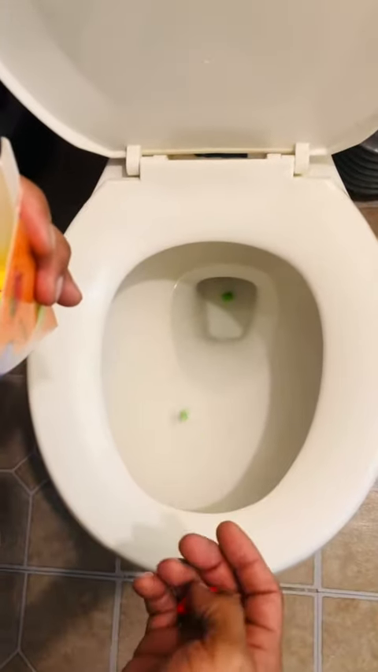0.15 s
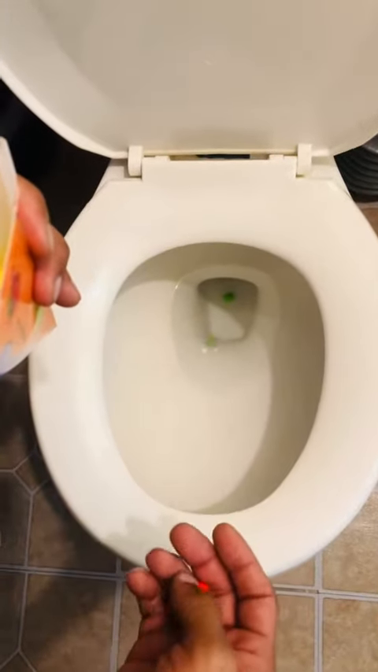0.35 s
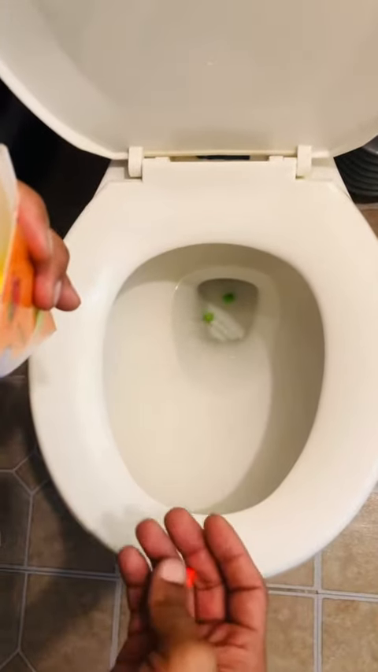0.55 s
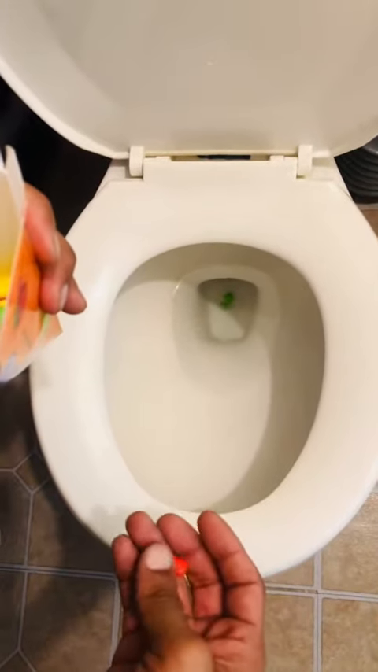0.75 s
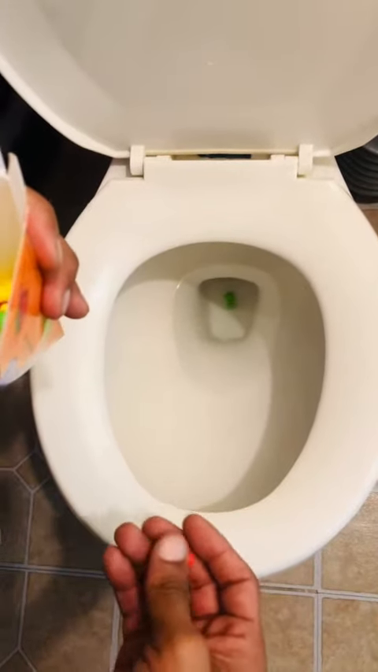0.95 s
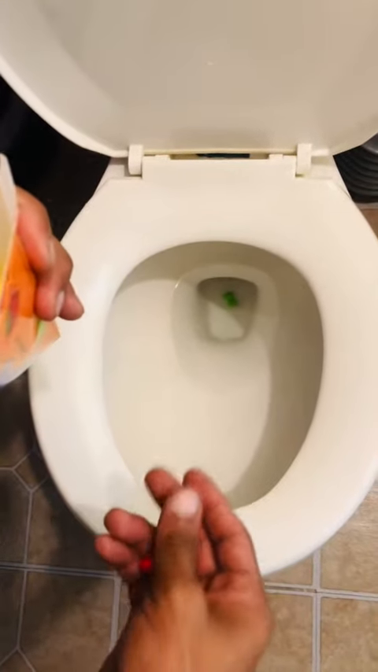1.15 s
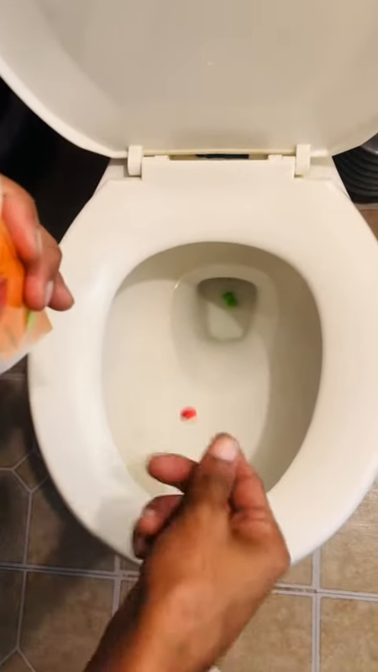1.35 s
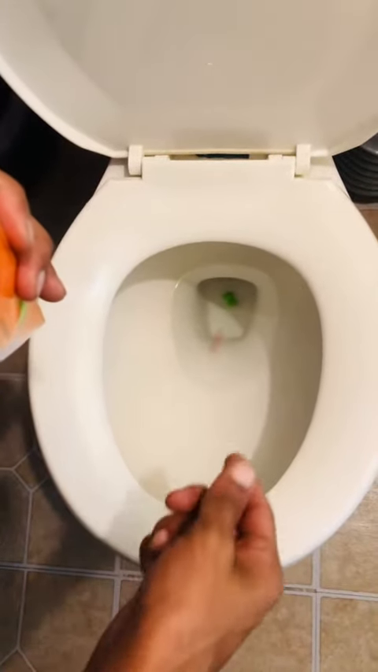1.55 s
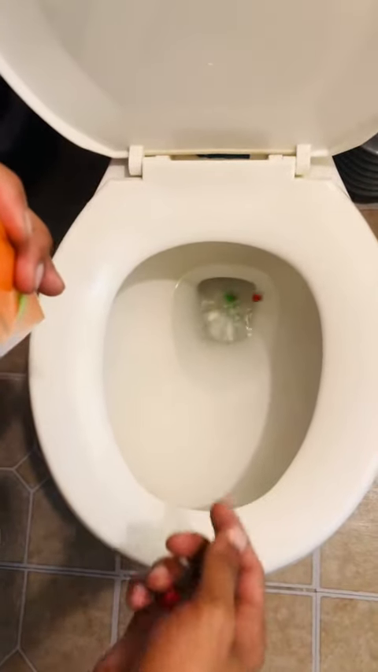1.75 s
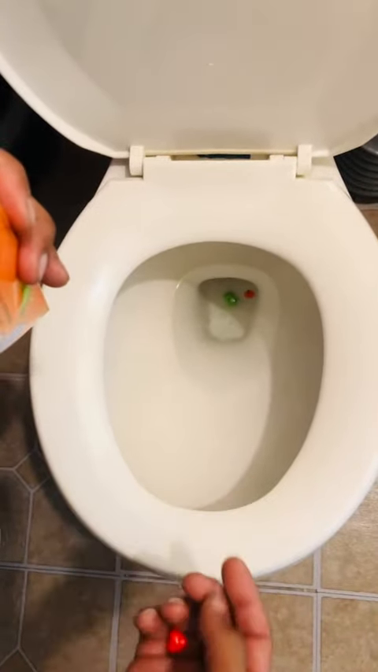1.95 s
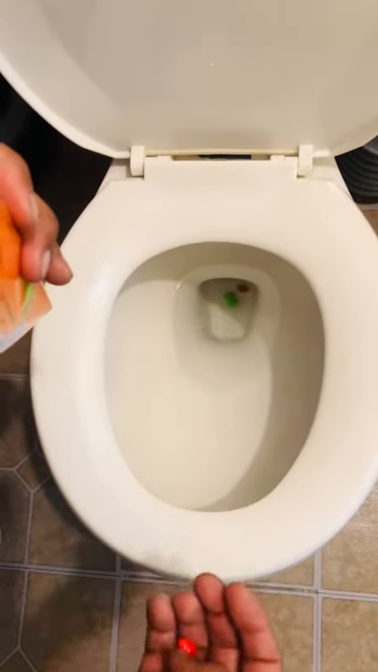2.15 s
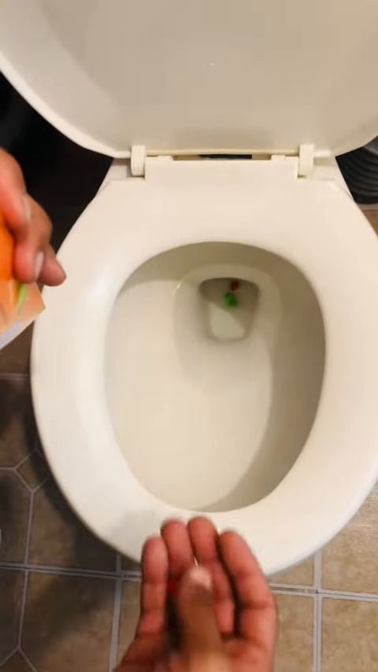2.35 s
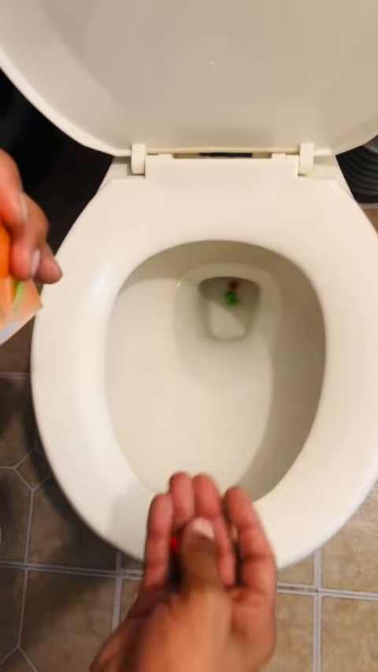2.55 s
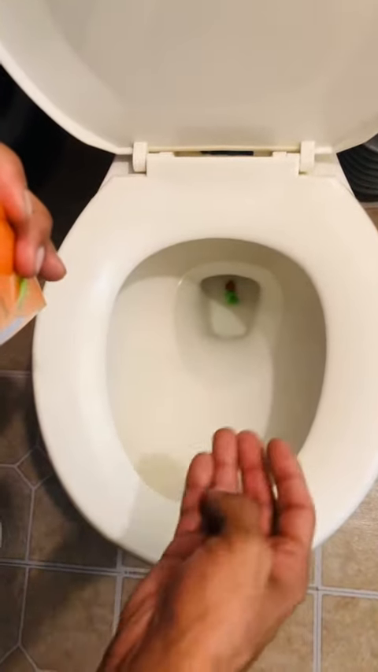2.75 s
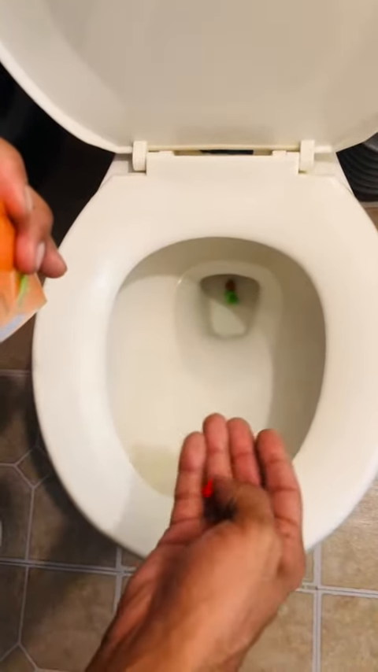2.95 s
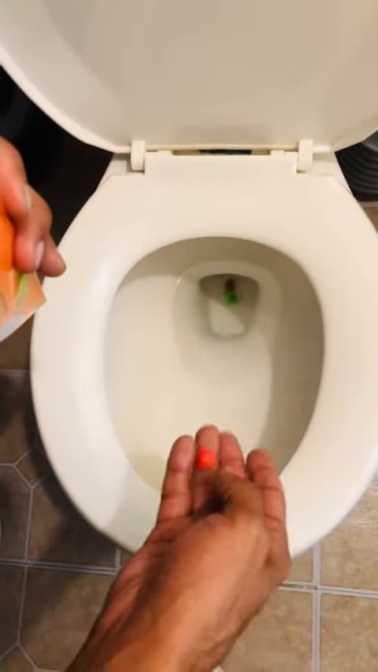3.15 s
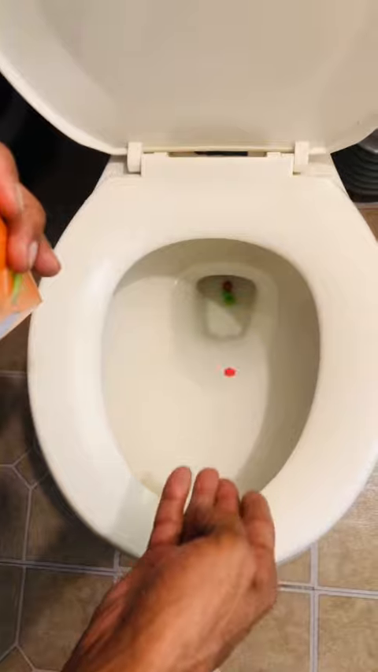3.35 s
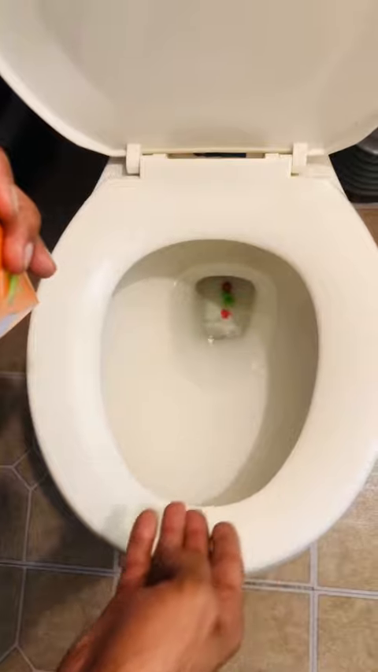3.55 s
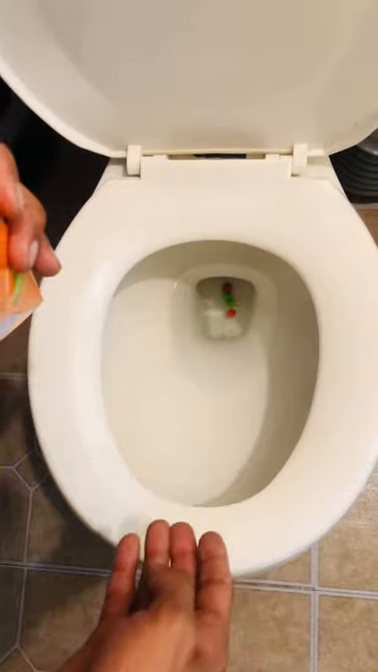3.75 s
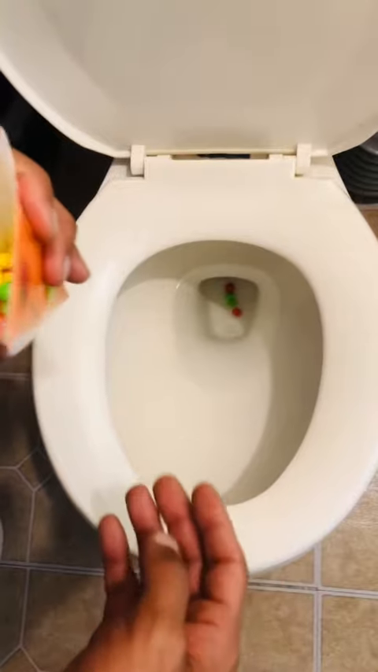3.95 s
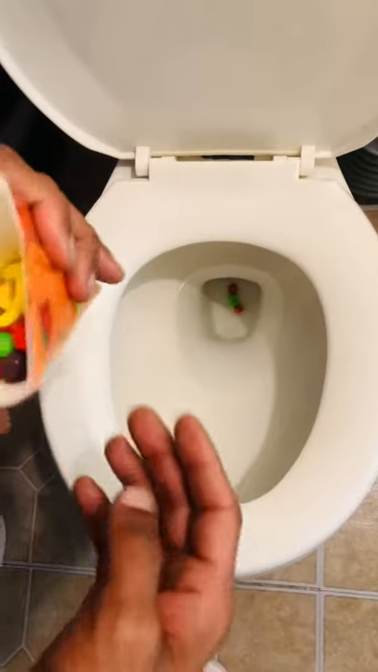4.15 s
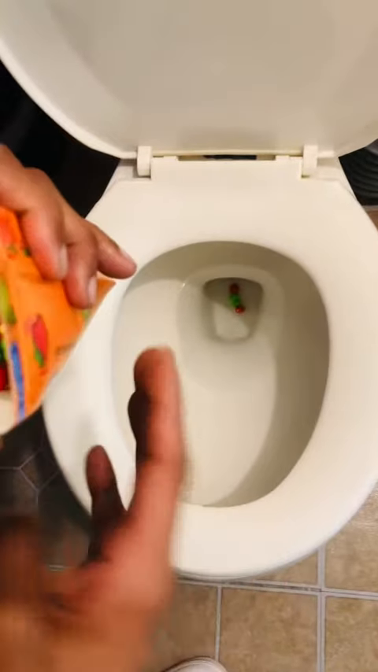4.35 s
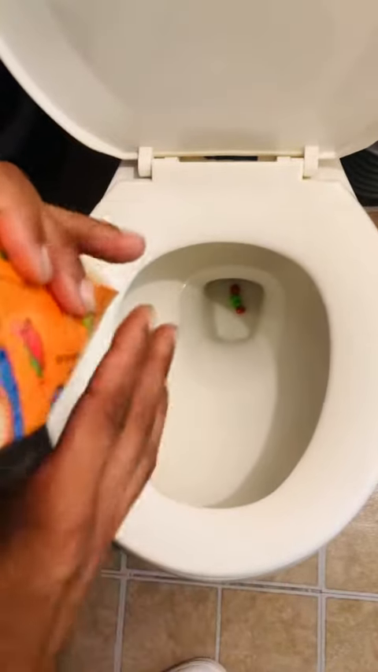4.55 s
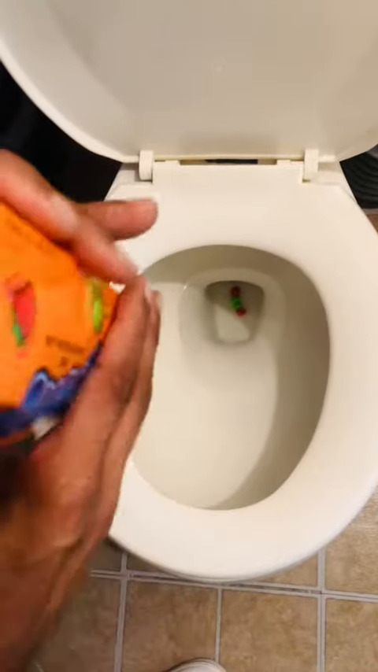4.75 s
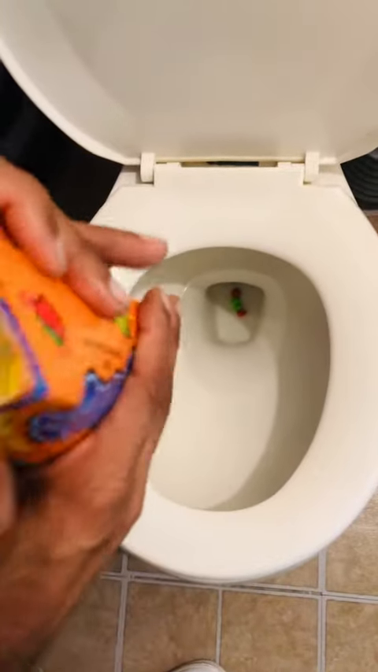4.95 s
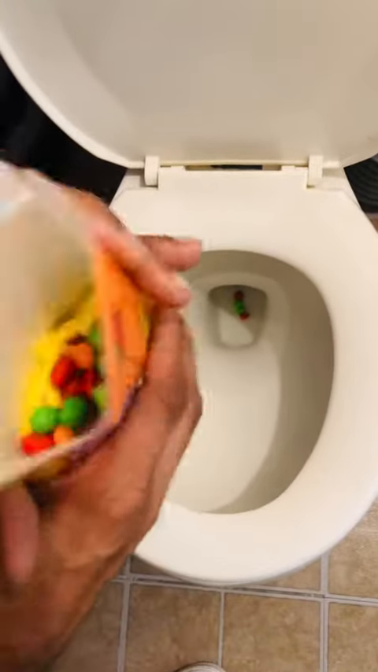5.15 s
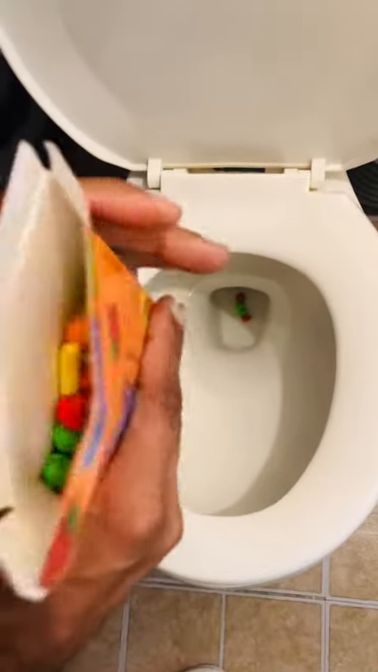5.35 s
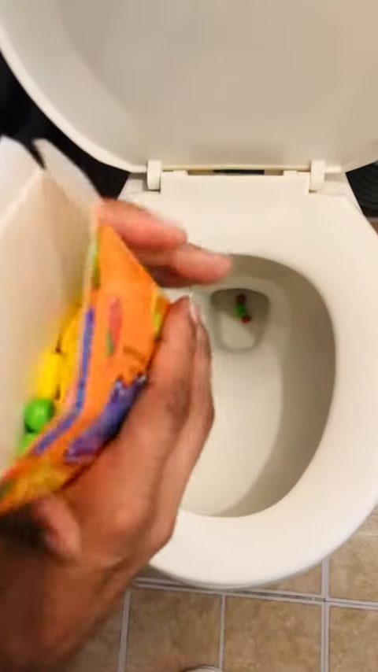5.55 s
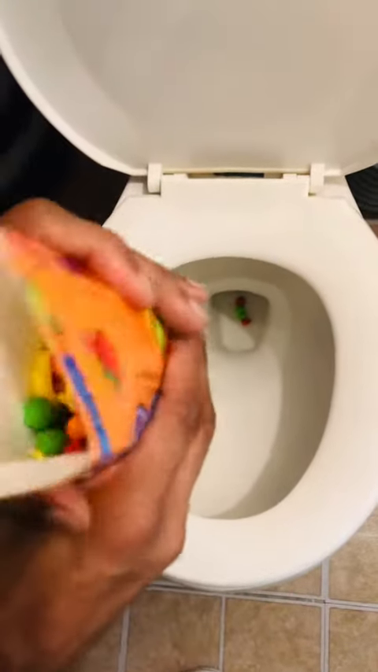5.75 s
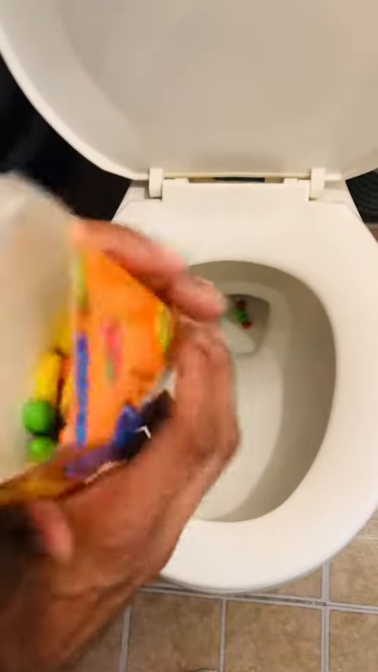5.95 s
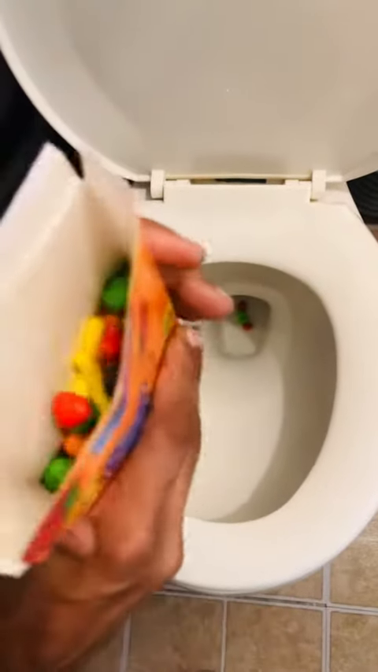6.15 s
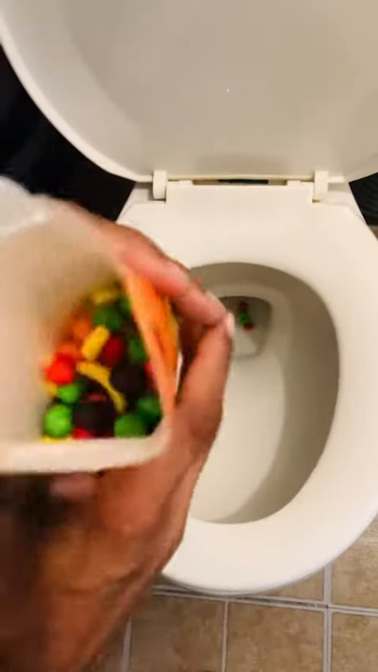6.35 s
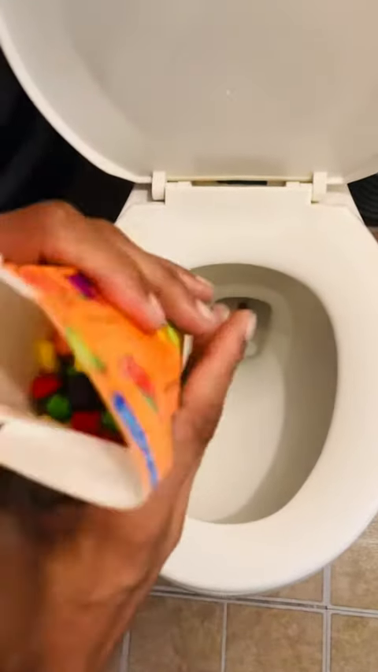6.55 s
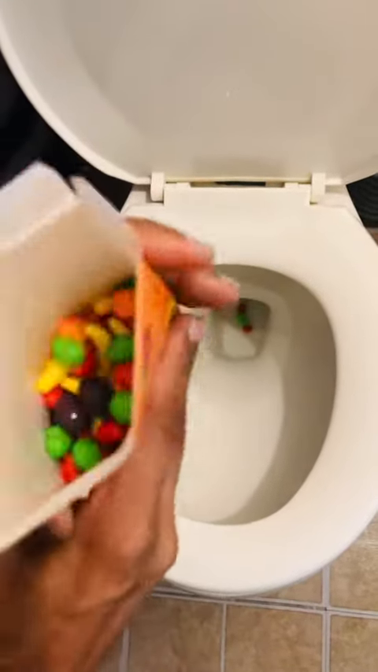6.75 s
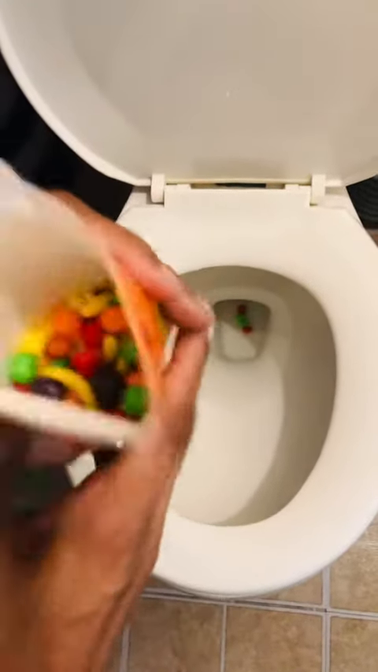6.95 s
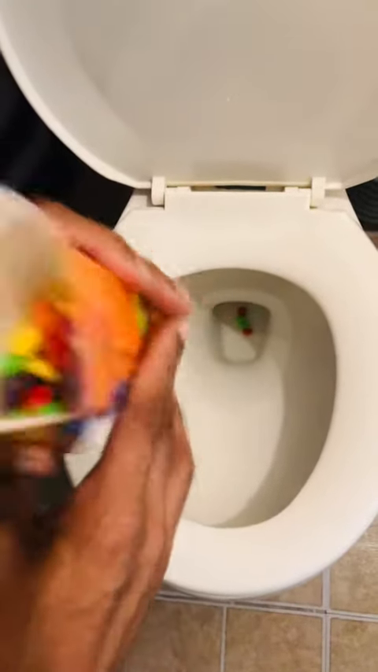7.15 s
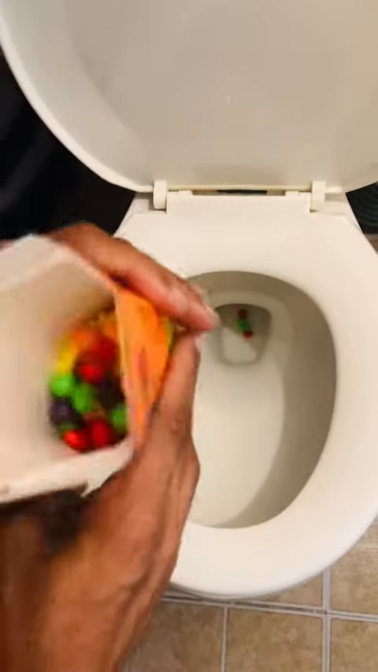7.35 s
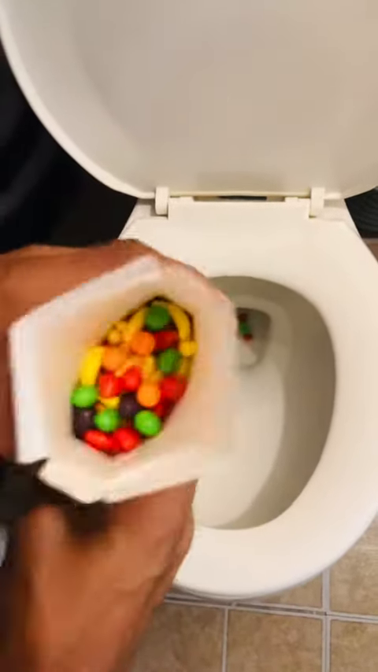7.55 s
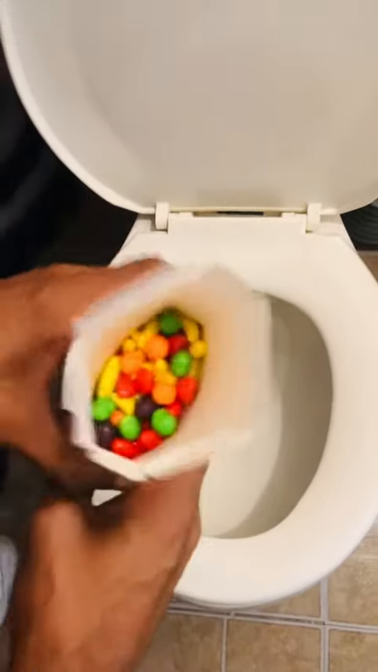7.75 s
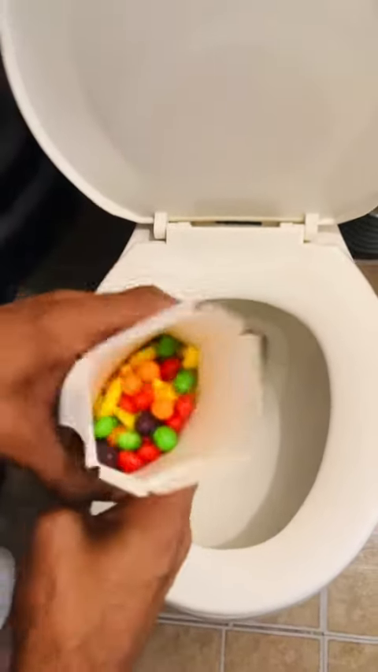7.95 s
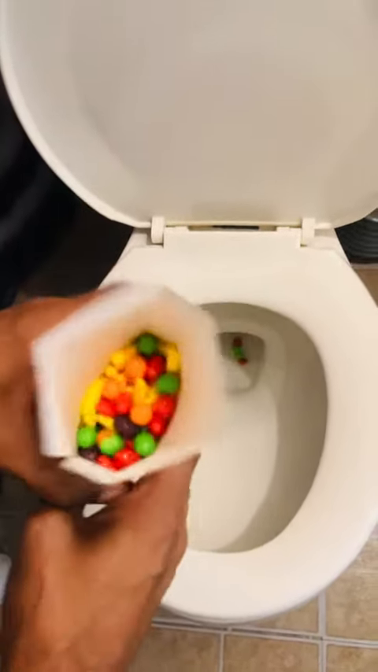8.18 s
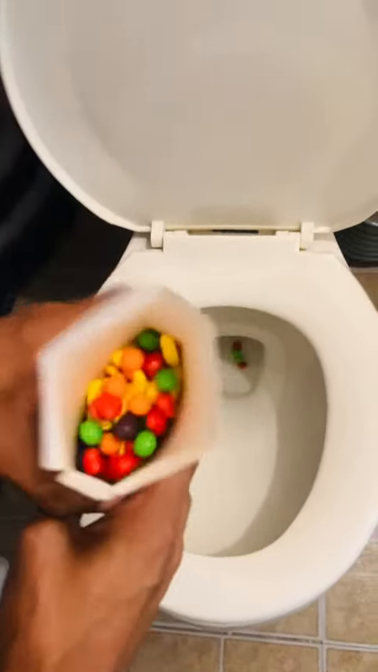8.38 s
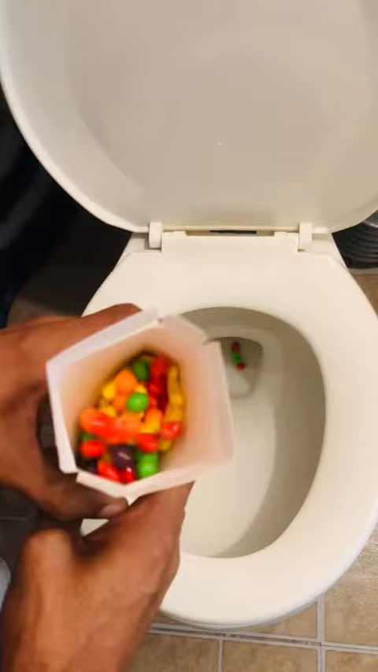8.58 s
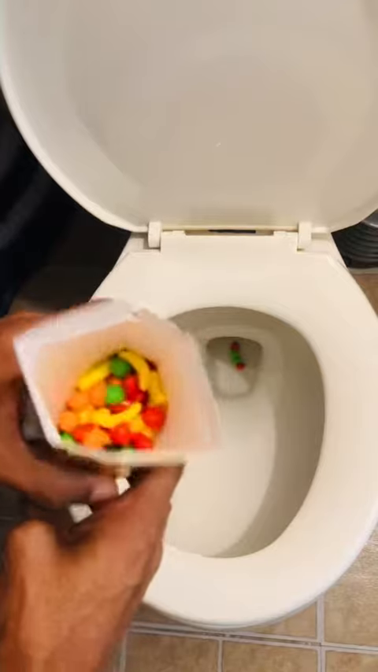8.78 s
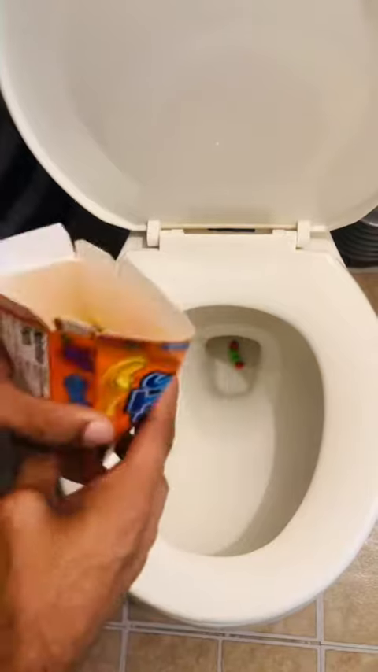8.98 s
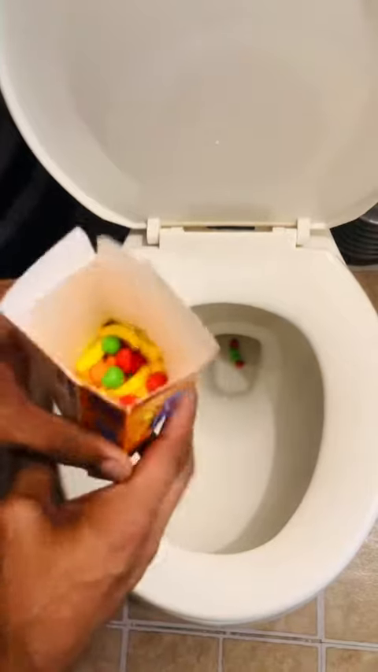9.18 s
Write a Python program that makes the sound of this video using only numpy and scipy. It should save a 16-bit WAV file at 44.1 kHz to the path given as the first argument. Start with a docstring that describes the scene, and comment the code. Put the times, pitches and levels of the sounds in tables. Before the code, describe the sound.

Candies ping off porcelain and plop into water, before a cardboard box of hard candy is handled and shaken rapidly up close.

```python
"""A faint hum lies under a small tiled bathroom. Three hard candies are tossed one by one into a toilet
bowl: each cracks on the porcelain and sets it ringing; a small splash and bubbles follow the first two.
Then the open cardboard box is gripped close by, and it rubs, creaks and snaps. It is tilted, and the
candies slide and clack inside. Ten shakes slam them against its drumming walls; a last tilt ends it."""
import sys
import numpy as np
from scipy import signal
from scipy.fft import rfft, irfft
from scipy.io import wavfile
from scipy.ndimage import uniform_filter1d, minimum_filter1d

SR = 44100
rng = np.random.default_rng(int(sys.argv[2]) if len(sys.argv) > 2 else 0)


def file_out(sig):
    """Save sig as 16-bit WAV at sys.argv[1]."""
    # one column per channel
    cols = np.atleast_2d(sig).T
    # limit, then scale
    lim = np.clip(cols, -1, 1)
    pcm = np.round(lim * 32767).astype(np.int16)
    wavfile.write(sys.argv[1], SR, pcm)


N = 406602
TIME = np.arange(N) / SR


def from_db(db):
    """Decibels to gain."""
    return 10 ** (np.asarray(db) / 20)


def at_hz(points, hz):
    """Table lookup on a log-frequency axis."""
    known_hz, values = np.transpose(points)
    return np.interp(np.log(np.maximum(hz, 1)), np.log(known_hz), values)


def follow(curve):
    """Gain along a level curve; silent outside it."""
    return from_db(np.interp(TIME, *np.transpose(curve), left=-120, right=-120))


def unit(response):
    """Scale to energy 1."""
    return response / np.sqrt(np.sum(response ** 2) + 1e-20)


def through(x, response):
    """Convolve, keeping the input length."""
    return signal.oaconvolve(x, response)[:len(x)]


def pulse(colour, size=4096):
    """Minimum-phase pulse with the given spectrum."""
    cepstrum = irfft(np.log(from_db(at_hz(colour, np.fft.rfftfreq(size, 1 / SR)))))
    cepstrum[1:size // 2] *= 2
    cepstrum[size // 2 + 1:] = 0
    return unit(irfft(np.exp(rfft(cepstrum))))


def flatten(response, bins=100):
    """Level the broad spectral peaks and dips of a random response."""
    spectrum = rfft(response)
    local_power = uniform_filter1d(np.abs(spectrum) ** 2, size=bins)
    return unit(irfft(spectrum / np.sqrt(local_power + 1e-12), len(response)))


def echoes(decay_table, count=12):
    """Dense reflections, each band with its own decay."""
    t = TIME[:SR // 2]
    centres_hz, hz = np.geomspace(120, 16000, count), np.fft.rfftfreq(len(t), 1 / SR)
    noise = rfft(rng.standard_normal(len(t)))
    bands = [irfft(noise * at_hz(np.c_[centres_hz, share], hz), len(t)) for share in np.eye(count)]
    tail = sum(band * from_db(-60 * t / t60_s)
               for band, t60_s in zip(bands, at_hz(decay_table, centres_hz)))
    fade = np.minimum(2 * (1 - t / t[-1]), 1) ** 2
    return unit(flatten(tail) * fade)


def ring(modes):
    """Damped sines of a struck body."""
    t = TIME[:SR // 2]
    return unit(sum(from_db(db - 60 * t / t60_s) * np.cos(2 * np.pi * hz * t) for hz, db, t60_s in modes))


def clicks(start_s, level_db):
    """One impulse per event; level is rms over 5 ms."""
    out = np.zeros(N)
    out[np.round(start_s * SR).astype(int)] = from_db(level_db) * np.sqrt(.005 * SR)
    return out


def chatter(hits, t60_s):
    """Each impact becomes a decaying noise burst."""
    pole = from_db(-120 / (t60_s * SR))
    power = signal.lfilter([1 - pole], [1, -pole], hits ** 2 + 1e-18)
    return np.sqrt(power) * rng.choice([-1, 1], N)


def collisions(power, calm_per_s=200, per_s_per_gain=35000, spread_db=6):
    """Random uneven impacts, denser with harder motion; output power near 1."""
    per_s = calm_per_s + per_s_per_gain * np.sqrt(power)
    hits = (rng.random(N) < per_s / SR) * rng.choice([-1, 1], N)
    hits = hits * from_db(spread_db * rng.standard_normal(N))
    local_power = uniform_filter1d(uniform_filter1d(hits ** 2, size=400), size=400)
    return hits / np.sqrt(np.maximum(local_power, 0) + 1e-4)


# air noise spectrum: freq_hz, gain_db
AIR_COLOUR = [(12, -55), (20, -34.5), (49, -12.5), (70, -4.5), (91, -9.5), (123, -5.5), (168, -11),
              (262, -16), (293, -9.5), (328, -18.5), (367, -16.5), (574, -22.5), (624, -24), (16000, -42.5)]
# mains partials: pitch_hz, level_db
HUM_PARTIALS = [(60, -73.5), (120, -70.5)]


def background(air_db=-65.5):
    """Soft air noise and mains hum."""
    hum = sum(from_db(db) * np.sqrt(2) * np.sin(2 * np.pi * hz * TIME) for hz, db in HUM_PARTIALS)
    return hum + from_db(air_db) * through(rng.standard_normal(N), pulse(AIR_COLOUR))


# room decay: freq_hz, t60_s
ROOM_DECAY = [(150, 0.13), (400, 0.97), (800, 0.51), (2000, 0.16), (5500, 0.17), (15000, 0.12)]


def bathroom(x, build_s=0.0046):
    """Tile reflections, building up after the direct sound."""
    onset = np.minimum(TIME[:SR // 2] / build_s, 1)
    return through(x, unit(echoes(ROOM_DECAY) * onset))


def moving_in_room(x, sway_hz=.6, count=4):
    """A moving source crossfades between reflection patterns."""
    weights = (np.maximum(np.cos(2 * np.pi * (sway_hz * TIME - k / count)), 0) for k in range(count))
    return sum(bathroom(x * weight) for weight in weights)


# bowl decay: freq_hz, t60_s
BOWL_DECAY = [(300, 0.19), (2000, 0.038), (6000, .07), (15000, 0.025)]


def bowl_echoes():
    """Short reflections inside the bowl."""
    return echoes(BOWL_DECAY)


# air bubbles: start_s, peak_db, pitch_hz, glide_octaves_per_s, t60_s
AIR_BUBBLES = [(0.324, -45, 1800, -2.5, 0.05), (0.324, -47.5, 2140, 0, .04), (0.348, -50, 1660, -0.5, .12),
               (0.350, -62, 3580, 0.5, 0.17), (0.356, -56, 7340, 4, .03), (1.61, -47.5, 930, 8.5, 0.2),
               (1.611, -38, 5260, 0, 0.023), (1.634, -44, 1290, 17, .04), (1.649, -43.5, 1076, 32.5, 0.11),
               (1.668, -44, 1900, 36, 0.036), (1.675, -51, 2580, -3, 0.08)]


def bubbles(onset_s=0.00035):
    """Trapped air rings; most bubbles glide, climbing an octave at most as they near the surface."""
    out, t = np.zeros(N), TIME[:SR // 8]
    for start_s, peak_db, pitch_hz, octaves_per_s, t60_s in AIR_BUBBLES:
        hz = pitch_hz * 2 ** np.minimum(octaves_per_s * t, 1)
        envelope = from_db(peak_db - 60 * t / t60_s) * (1 - np.exp(-t / onset_s))
        start = int(start_s * SR)
        out[start:start + len(t)] += envelope * np.sin(2 * np.pi * np.cumsum(hz) / SR)
    return out


# surface spatter: start_s, level_db, t60_s
SPATTER = [(0.324, -58, 0.034), (0.347, -60, .08), (0.372, -68, .09), (1.61, -53, .05), (1.66, -63, .06)]
# spatter spectrum: freq_hz, gain_db
SPATTER_COLOUR = [(400, -25), (1100, -0.5), (1900, -1), (2700, 1), (3700, 2), (5000, -7), (7500, 1),
                  (10000, -15.5), (15000, -25)]


def water(cavity_db=-5.5):
    """The surface breaks; spatter and bubbles echo in the bowl."""
    spatter = sum(chatter(clicks(np.array([s]), db), t60_s) for s, db, t60_s in SPATTER)
    direct = bubbles() + through(spatter, pulse(SPATTER_COLOUR))
    return direct + from_db(cavity_db) * through(direct, bowl_echoes())


# candy on porcelain: start_s, level_db, crack_rel_db, ring_rel_db, hollow_rel_db
BOWL_STRIKES = [(0.1101, -26.5, 7.5, -9, -6), (0.527, -61.5, -10, -1, -20), (0.597, -64.5, -12, 1.5, -20),
                (1.5104, -20.5, -6, -3, -12), (1.686, -47.5, -23, -1.5, -25), (3.402, -22, -17, -5, -21.5)]
# spectra of crack, porcelain and bowl air: freq_hz, gain_db
CRACK_COLOUR = [(100, -35), (700, -32), (2000, -23.5), (3500, -15.5), (5000, -5), (6200, 2), (10000, 3),
                (15500, -1)]
PORCELAIN_COLOUR = [(500, -41), (1900, -16), (2500, -7.5), (4200, -2), (5600, -6.5), (8000, -6.5),
                    (15000, -17.5)]
HOLLOW_COLOUR = [(60, -10), (230, -2), (500, -5.5), (720, -13.5), (1150, -3.5), (1700, 2), (2100, -11),
                 (6000, -32)]
# modes of porcelain and bowl air: pitch_hz, gain_db, t60_s
PORCELAIN_MODES = [(2740, -8, .1), (3120, -8.5, 0.18), (3947, 1, 0.13), (4470, 3, 0.065), (5620, 8, 0.14),
                   (5970, -1.5, .15), (6923, 7.5, .12), (7420, 7.5, 0.098), (8387, -1.5, .09),
                   (8750, 3, .09)]
HOLLOW_MODES = [(1130, -9.5, 0.12), (1620, -3.5, 0.13)]


def bowl_strikes(cavity_db=2):
    """A hard crack, then the porcelain and the air in its hollow ring on."""
    start_s, level_db, crack_db, ring_db, hollow_db = np.transpose(BOWL_STRIKES)
    crack = chatter(clicks(start_s, level_db + crack_db), t60_s=0.003)
    crack += from_db(cavity_db) * through(clicks(start_s, level_db), bowl_echoes())
    porcelain = from_db(1.5) * through(bowl_echoes(), pulse(PORCELAIN_COLOUR))
    porcelain += from_db(-6) * ring(PORCELAIN_MODES)
    hollow = from_db(-7) * through(bowl_echoes(), pulse(HOLLOW_COLOUR))
    hollow += from_db(-12) * ring(HOLLOW_MODES)
    return (through(crack, pulse(CRACK_COLOUR))
            + through(clicks(start_s, level_db + ring_db), porcelain)
            + through(clicks(start_s, level_db + hollow_db), hollow))


# whole-load bumps: centre_s, level_db, width_s, pitch_hz
LOAD_THUMPS = [(4.186, -42, 0.006, 307), (5.249, -39.5, 0.028, 153), (6.038, -34.5, 0.053, 184),
               (6.095, -39.5, 0.019, 80), (6.276, -37.5, 0.013, 58), (6.289, -27, 0.03, 280)]


def thumps(t60_cycles=4):
    """The load shifts its weight; the box gives a dull, briefly ringing bump."""
    out, t = np.zeros(N), TIME[:SR // 2] - .25
    for centre_s, level_db, width_s, hz in LOAD_THUMPS:
        push = rng.standard_normal(len(t)) * np.exp(-np.minimum((t / width_s) ** 2, 20))
        bump = through(push, ring([(hz, 0, t60_cycles / hz)]))
        bump = signal.sosfilt(signal.butter(2, 2 * hz, fs=SR, output="sos"), bump)
        start = int((centre_s + t[0]) * SR)
        out[start:start + len(t)] += from_db(level_db) * np.sqrt(width_s * SR) * unit(bump)
    return out


# lone candy contacts: start_s, level_db
CANDY_TICKS = [(2.028, -65), (2.389, -58), (4.35, -30.5), (4.496, -32), (5.387, -21), (6.7712, -21),
               (6.836, -12), (6.947, -19), (6.964, -22), (8.7005, -18.5)]
# tick spectrum: freq_hz, gain_db
TICK_COLOUR = [(200, -28), (1500, -14), (4000, -12), (7500, -6), (10000, 0), (13000, -2), (15500, -4.5)]


def ticks(t60_s=0.0057):
    """Two sugar shells touch once."""
    return through(chatter(clicks(*np.transpose(CANDY_TICKS)), t60_s), pulse(TICK_COLOUR))


# shifting grip, base curve for rub and creaks: time_s, level_db
GRIP = [(3.76, -74), (3.85, -56.5), (4.048, -54), (4.57, -42.5)]
# friction spectrum: freq_hz, gain_db
RUB_COLOUR = [(100, -26), (350, -4.5), (600, 9), (900, 0.5), (1400, -4), (2200, -0.5), (5000, -3),
              (8000, -18), (15000, -30.5)]


def rub(finger_db=-4.5, scrape_db=0.5, slips_per_s=24, slip_db=5, count=400):
    """Stick-slip on cardboard: fingers outside, the load inside on each backswing."""
    slips = np.interp(TIME * slips_per_s, np.arange(count), rng.uniform(-1, 1, count))
    gain = from_db(finger_db + slip_db * slips) * follow(GRIP) + from_db(scrape_db) * backswings()
    catches = collisions(gain ** 2, calm_per_s=550, spread_db=8)
    return gain * through(chatter(catches, t60_s=0.0057), pulse(RUB_COLOUR))


def creak_events(per_s=19, above_grip_db=1, spread_db=4.5, knock_db=4, count=60):
    """The gripped cardboard creaks at uneven gaps; rows as in SHARP_HITS."""
    grip_s, grip_db = np.transpose(GRIP)
    gap, size = rng.uniform(-1, 1, (count, 2)).T
    start_s = grip_s[0] + np.cumsum(1 + gap) / per_s
    level_db = np.interp(start_s, grip_s, grip_db) + above_grip_db + spread_db * size
    return np.c_[start_s, level_db, np.full(count, knock_db)][start_s < grip_s[-1]]


# cardboard snaps and single loud candy clacks: start_s, level_db, knock_rel_db
SHARP_HITS = [(3.8946, -51.5, -1), (3.931, -53, 5.5), (4.001, -53, 6), (4.3195, -38.5, -2),
              (4.348, -43, 5.5), (4.419, -29.5, 0.5), (4.451, -37, -3), (4.5073, -28.5, -1.5),
              (4.535, -39, -5), (4.6282, -43, -8), (4.927, -36, -4), (5.017, -43, -11), (5.188, -12, -12),
              (5.42, -21, -9), (6.2531, -17.5, 10), (6.414, -35, -1), (6.438, -28, -3), (6.466, -27.5, -3),
              (6.5795, -34.5, -1), (8.733, -31.5, -12), (8.960, -37, 0.5), (9.028, -43.5, 4),
              (9.095, -42, 0)]


def snap_events(slam_rel_db=-8, slam_knock_db=3.5):
    """Rows of all sharp hits: cardboard snaps, loud clacks, the first candies of each slam, creaks."""
    slams = [(s, db + slam_rel_db, slam_knock_db) for s, db, *_ in BOX_SHAKES]
    return np.vstack([SHARP_HITS, slams, creak_events()])


# shakes: slam_s, slam_db, backswing_db, settle_db_per_s, knock_rel_db
BOX_SHAKES = [(7.170, -9.5, -28, 305, -5.5), (7.337, -11, -31, 270, -3), (7.486, -10, -39, 541, -7.5),
              (7.624, -27.5, -46, 355, -6), (7.777, -9.5, -42, 490, -7.5), (7.934, -11.5, -37, 320, -3.5),
              (8.104, -11, -39, 431, -7), (8.276, -11.5, -36, 342, -5), (8.431, -13, -34, 210, -2),
              (8.582, -12, -29, 185.5, -3)]


def backswings(lead_s=.032, width_s=.036):
    """Gain of the soft slide before each slam."""
    return sum(from_db(db) * np.exp(-np.minimum(.5 * ((TIME - slam_s + lead_s) / width_s) ** 2, 20))
               for slam_s, _, db, *_ in BOX_SHAKES)


def slams(rise_db_per_s=2000, hold_s=.019):
    """The load slams home and settles; yields gain, knock_db per shake."""
    for slam_s, slam_db, _, settle_db_per_s, knock_db in BOX_SHAKES:
        before_db = rise_db_per_s * np.maximum(slam_s - TIME, 0)
        after_db = settle_db_per_s * np.maximum(TIME - slam_s - hold_s, 0)
        yield from_db(slam_db - np.minimum(before_db + after_db, 150)), knock_db


# sliding load, one curve per tilt: time_s, level_db, knock_rel_db
TILT_SLIDES = [
    [(4.6, -77, 13), (4.634, -42, -0.5), (4.694, -29, -3.5), (4.784, -35, -2.5), (4.792, -28.5, -12),
     (4.816, -35, -1.5), (4.926, -28, -6.5), (4.964, -50.5, -2), (5.0, -44, -10)],
    [(5.0, -49, -2.5), (5.122, -27, -3.5), (5.162, -34, -7), (5.192, -18, -12.5), (5.216, -20, -11),
     (5.262, -13, -6), (5.276, -23, -4), (5.29, -21, -7), (5.38, -27, -7)],
    [(5.38, -27, -14), (5.386, -21, -20), (5.396, -31, -3), (5.41, -29, -2), (5.418, -18, -13),
     (5.43, -18, -6), (5.49, -27, -5.5), (5.5, -34, -2), (5.56, -51, 1)],
    [(5.56, -50, 0), (5.618, -24, -3), (5.648, -22, -5), (5.672, -30, -3.5), (5.71, -28, -3),
     (5.762, -47, -1), (5.8, -37, -6), (5.808, -43, 2), (5.86, -46, -4)],
    [(5.86, -40, -8), (5.87, -44, 3.5), (5.92, -20.5, -5), (5.966, -24, -4.5), (6.06, -14, -7),
     (6.132, -26, -6), (6.236, -21, -14), (6.25, -18, -6)],
    [(6.262, -27, 6), (6.27, -16, -8), (6.282, -15, 0), (6.318, -16, -7.5), (6.388, -35, -2),
     (6.454, -35, -10), (6.468, -28, -7.5), (6.48, -41.5, 2), (6.55, -57, 1)],
    [(6.55, -54, -3.5), (6.662, -19, -5), (6.734, -24, -7), (6.76, -36, -4), (6.77, -21, -15),
     (6.786, -33, -6.5), (6.858, -14, -6.5), (6.918, -33, 0), (6.943, -31, -4.5)],
    [(8.74, -36, -10), (8.778, -52, 0), (8.95, -46.5, -3.5), (8.956, -40.5, -5.5), (9.038, -52.5, 2),
     (9.06, -65, 11), (9.092, -45, -3.5), (9.204, -32, -3.5), (9.22, -39.5, -3.5)],
]
# restless load between moves: time_s, level_db
LOAD_STIR = [(4.9, -52), (6.55, -65), (6.93, -35), (7.0, -43), (7.7, -55), (8.75, -46)]


def agitation(slide_knock_db=1, backswing_knock_db=1.5):
    """Collision power of the moving load: candy on candy, candy on wall."""
    moves = [(follow(LOAD_STIR), 0), (backswings(), backswing_knock_db)]
    for tilt in TILT_SLIDES:
        time_s, level_db, knock_db = np.transpose(tilt)
        moves.append((follow(np.c_[time_s, level_db]), np.interp(TIME, time_s, knock_db + slide_knock_db)))
    moves.extend(slams())
    candy_power = sum(gain ** 2 for gain, _ in moves)
    wall_power = sum((gain * from_db(knock_db)) ** 2 for gain, knock_db in moves)
    return candy_power, wall_power


# share of knocks on the box bottom: time_s, share
BOTTOM_SHARE = [(3.8, 0.6), (4.4, 0.98), (4.7, 0.05), (6.3, 0.4), (6.7, 0.25), (7.2, 0.83), (7.5, 1),
                (8.6, 0.9), (9.2, 0.46)]
# spectra of slack sides and stiff bottom: freq_hz, gain_db
SIDE_COLOUR = [(30, -35.5), (100, -21.5), (200, -10.5), (330, -6.5), (520, -0.5), (780, -2.5), (950, -6.5),
               (1250, -3.5), (1800, -9), (3500, -10.5), (10000, -46)]
BOTTOM_COLOUR = [(30, -33), (120, -44.5), (220, -14.5), (330, -7.5), (520, 1), (800, 1.5), (950, 0),
                 (1200, 1.5), (1800, -6.5), (3500, -9), (10000, -43)]


def cardboard_panels(knocks, t60_s=0.041):
    """Cardboard drums; knocks move from sides to bottom as the box turns upright."""
    share = np.clip(np.interp(TIME, *np.transpose(BOTTOM_SHARE)), 0, 1)
    sides = through(chatter(knocks * np.sqrt(1 - share), t60_s), pulse(SIDE_COLOUR))
    bottom = through(chatter(knocks * np.sqrt(share), t60_s), pulse(BOTTOM_COLOUR))
    return sides + bottom


def shell_pings(hits, t60_s=0.017, partials=3):
    """Each impact rings a sugar shell at a few random pitches."""
    starts, t = np.flatnonzero(hits), TIME[:SR // 100]
    hz = rng.uniform(800, 16000, (len(starts), partials, 1))
    envelope = np.sqrt(2 / partials) * unit(from_db(-60 * t / t60_s))
    pings = hits[starts, None] * np.sin(2 * np.pi * hz * t).sum(axis=1) * envelope
    samples = starts[:, None] + np.arange(len(t))
    return np.bincount(samples.ravel(), pings.ravel(), N)[:N]


# spectra of a snap and of candy on candy: freq_hz, gain_db
SNAP_COLOUR = [(100, -26.5), (800, -16.5), (2000, -2.5), (5000, 1), (9000, -1.5), (13000, -0.5),
               (15500, -8)]
CLACK_COLOUR = [(100, -53), (700, -15.5), (1600, -7), (2400, 3), (4000, 3), (6500, 2.5), (9500, 1.5),
                (12500, -1), (15500, -6.5)]
# modes of the box and nearby air: pitch_hz, gain_db, t60_s
BOX_MODES = [(205.4, -10, 0.088), (302.6, 2.5, 0.35), (373, 4, 0.31), (527.3, 4.5, 0.18), (590, 8, 0.24),
             (709, -38, .16), (773, 4.5, .12), (1087, 6, .12), (2303, 12.5, 0.046), (3060, -1, .05),
             (4740, 1, 0.041)]


def candy_box(ping_db=-4.5, rattle_db=-10, crack_db=-7, wall_db=0.5, modes_db=-9, room_db=-15):
    """Sugar shells clack, the clacks bounce around the box, and its walls drum and ring."""
    candy_power, wall_power = agitation()
    snap_s, snap_db, knock_db = snap_events().T
    snaps = clicks(snap_s, snap_db)
    impacts = collisions(candy_power)
    clacks = impacts * np.sqrt(candy_power)
    knocks = impacts * np.sqrt(wall_power) + clicks(snap_s, snap_db + knock_db)
    pings = from_db(ping_db) * shell_pings(clacks)
    rattle = from_db(rattle_db) * chatter(clacks + snaps / 2, t60_s=.03)
    cracks = through(chatter(snaps + from_db(crack_db) * clacks, t60_s=0.008), pulse(SNAP_COLOUR))
    panels = from_db(wall_db) * cardboard_panels(knocks)
    direct = through(pings + rattle, pulse(CLACK_COLOUR)) + cracks + panels + ticks() + rub()
    resonance = from_db(modes_db) * through(knocks, ring(BOX_MODES))
    return direct + from_db(room_db) * moving_in_room(direct) + resonance


def scene(bowl_room_db=-5.5, water_room_db=-12.5):
    """Bowl, water and box in the tiled room; mono."""
    bowl, plops = bowl_strikes(), water()
    room = bathroom(from_db(bowl_room_db) * bowl + from_db(water_room_db) * plops)
    return (bowl + plops + room + candy_box() + thumps() + background())[None]


def record(dry, ceiling=0.66, cutoff_hz=16000):
    """Fast peak limiter, then a steep low-pass."""
    allowed = np.minimum(1, ceiling / (np.abs(dry) + 1e-9))
    gain = uniform_filter1d(minimum_filter1d(allowed, size=45), size=45)
    low_pass = signal.ellip(10, .2, 80, cutoff_hz, fs=SR, output="sos")
    return signal.sosfilt(low_pass, gain * dry)


dry = scene()
out = record(dry)
file_out(out)
```